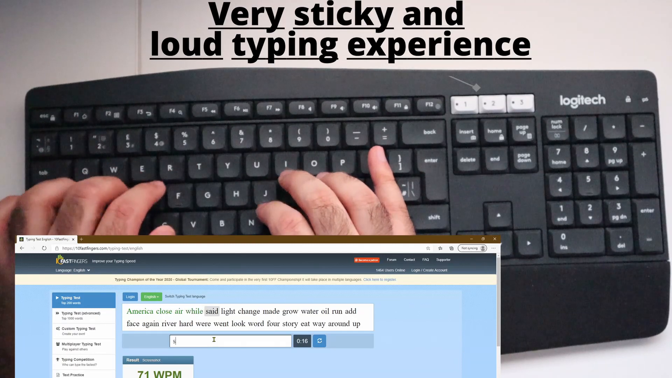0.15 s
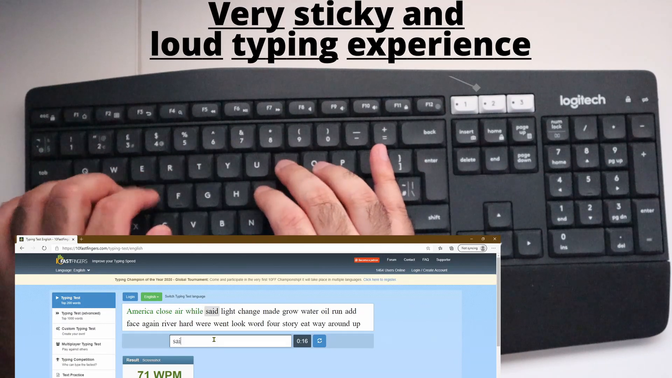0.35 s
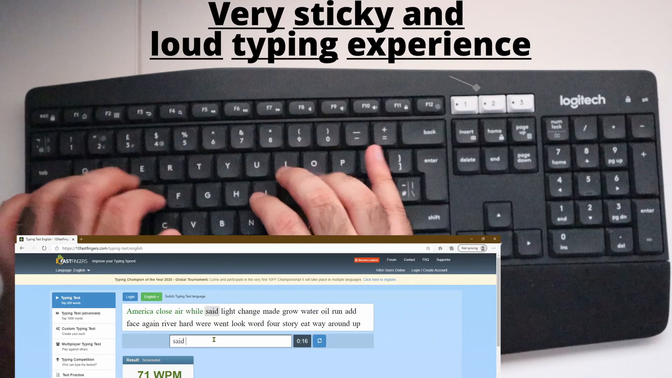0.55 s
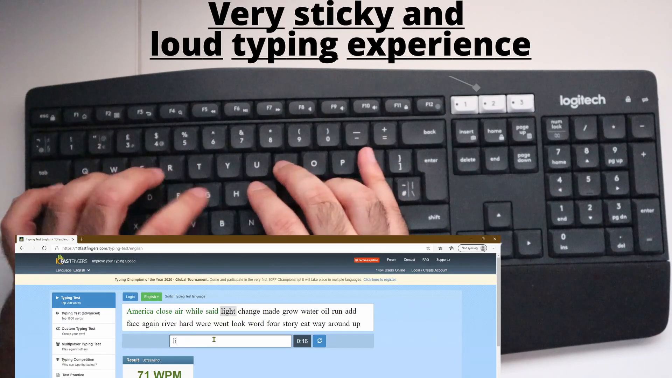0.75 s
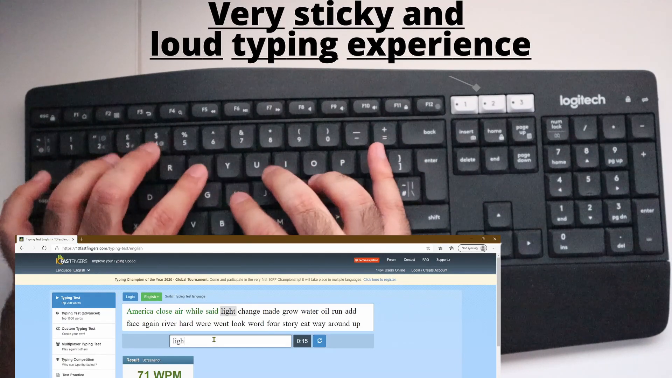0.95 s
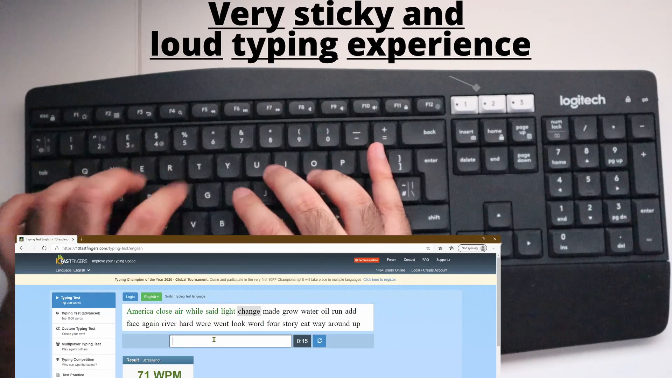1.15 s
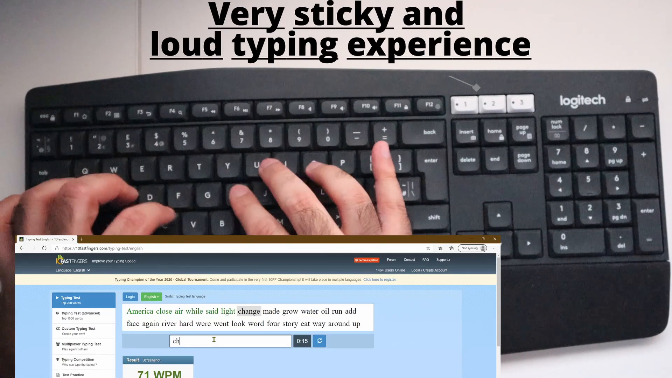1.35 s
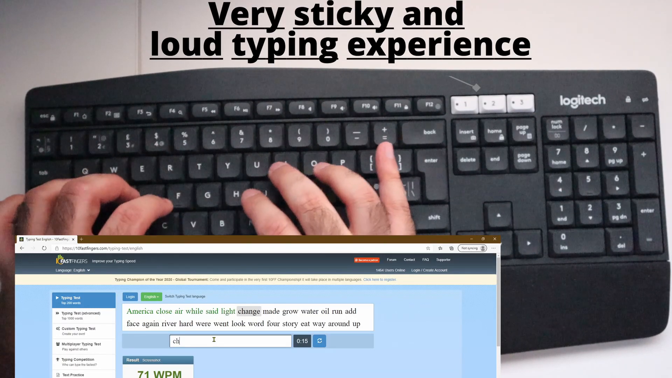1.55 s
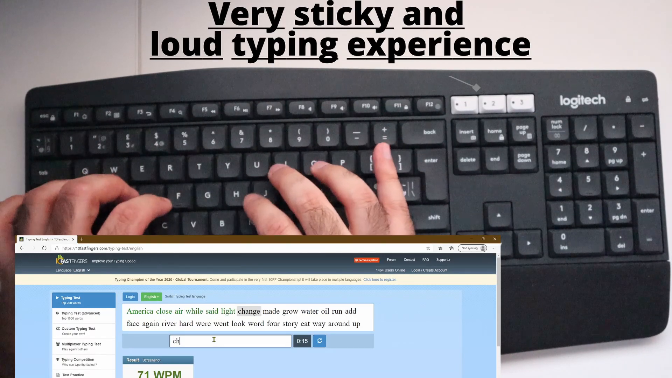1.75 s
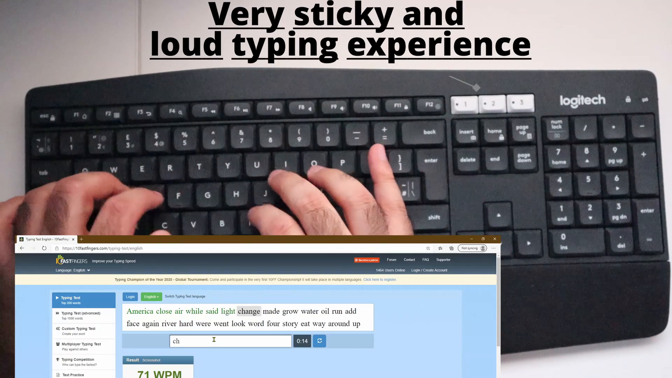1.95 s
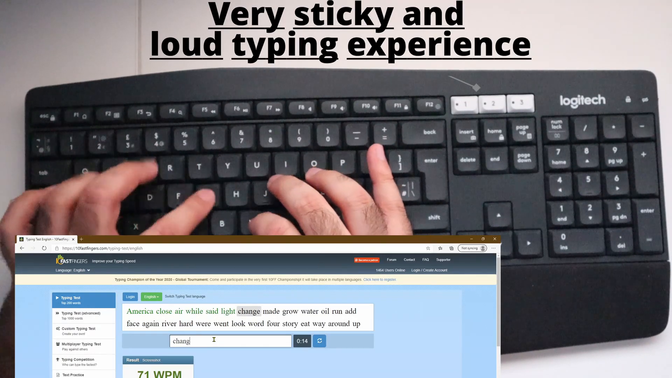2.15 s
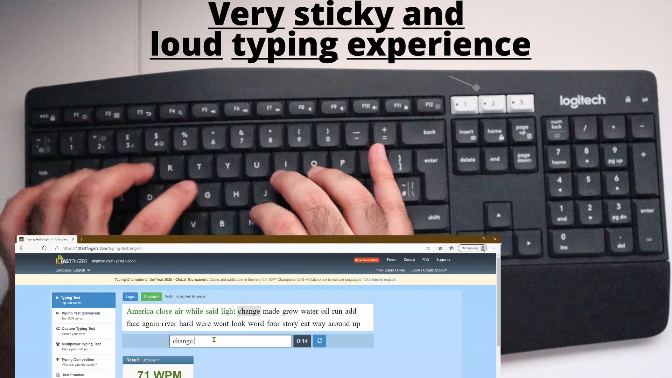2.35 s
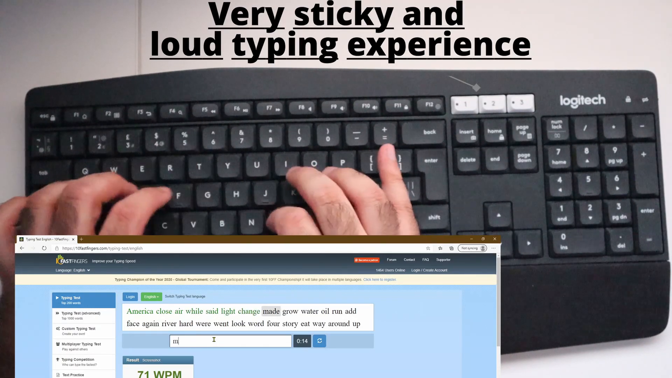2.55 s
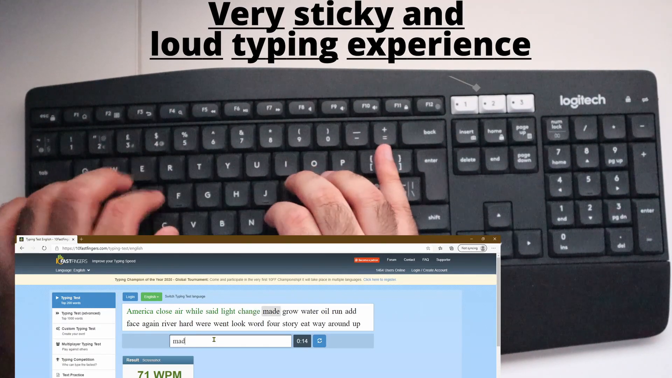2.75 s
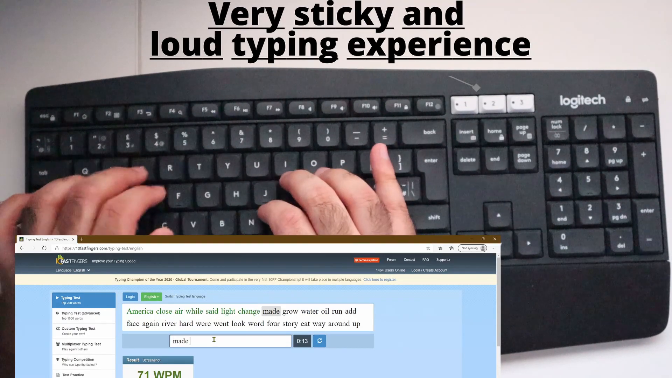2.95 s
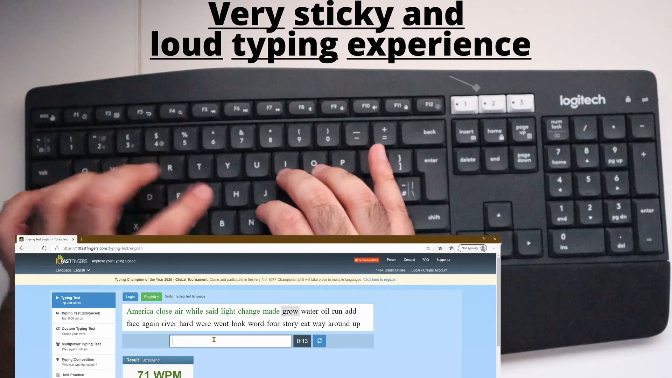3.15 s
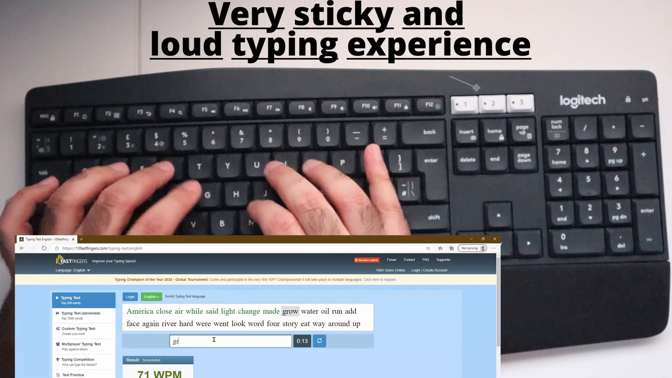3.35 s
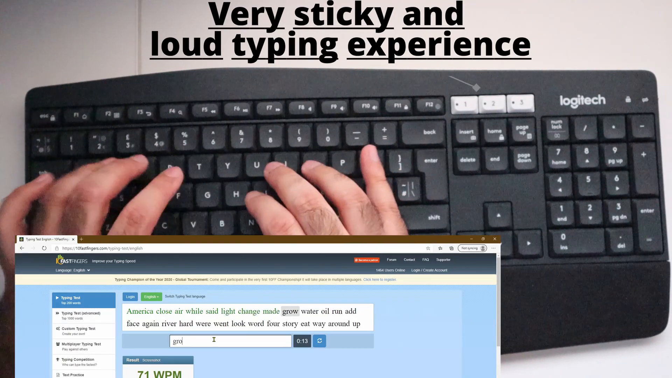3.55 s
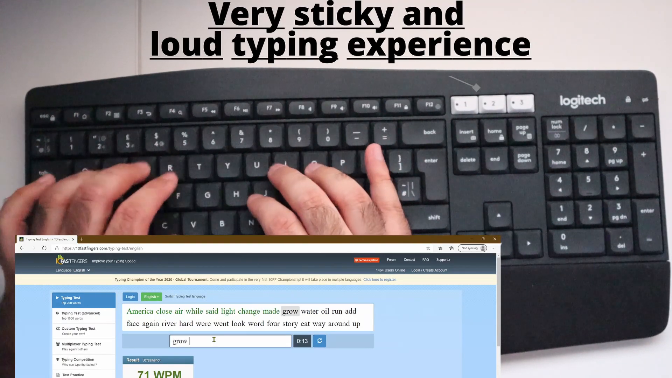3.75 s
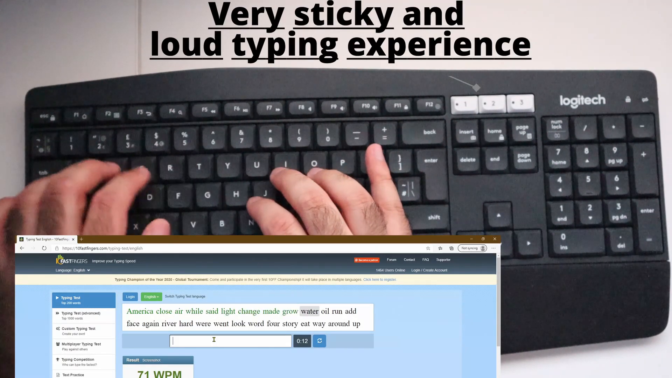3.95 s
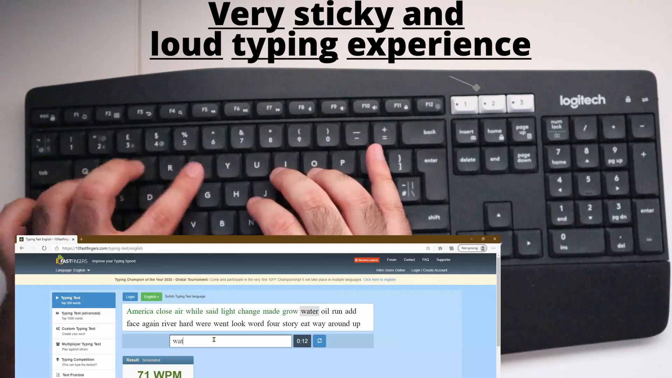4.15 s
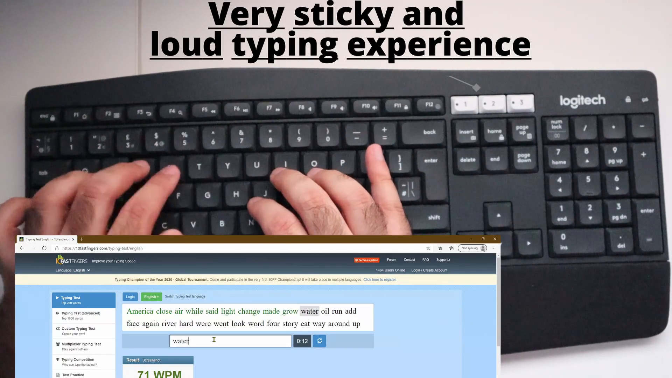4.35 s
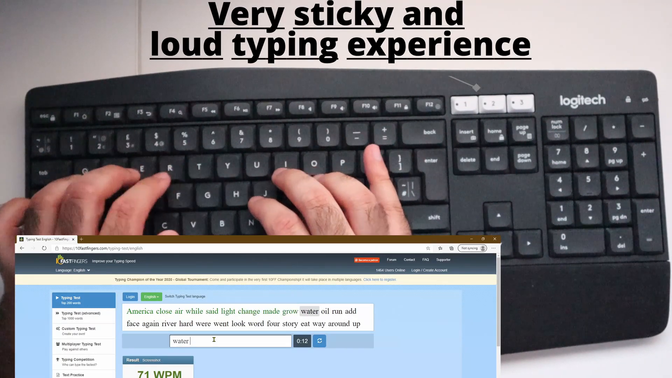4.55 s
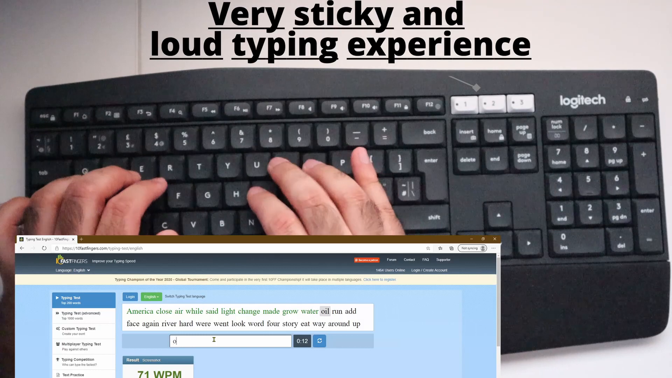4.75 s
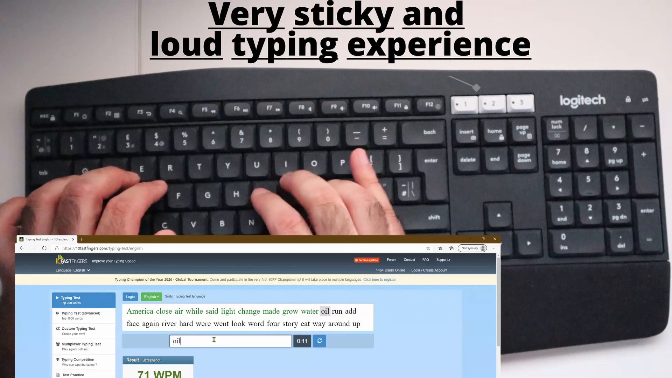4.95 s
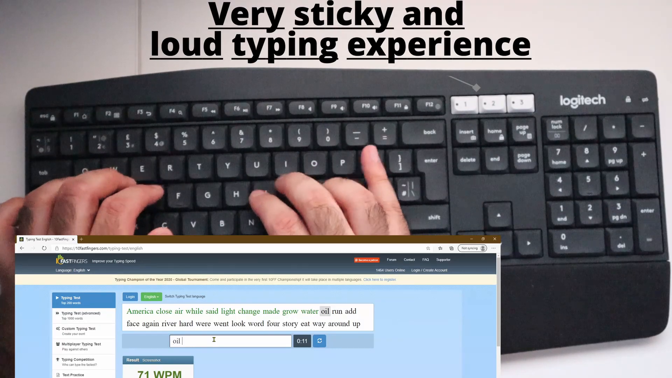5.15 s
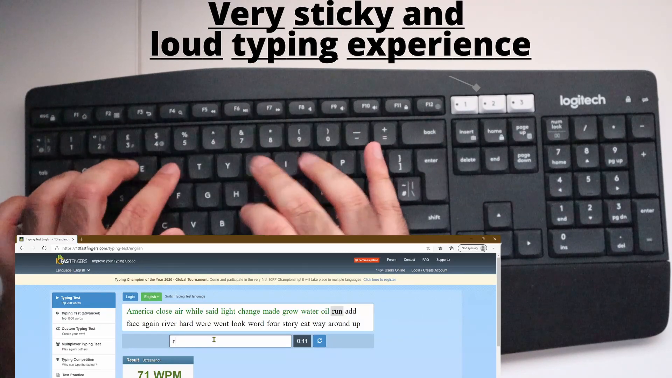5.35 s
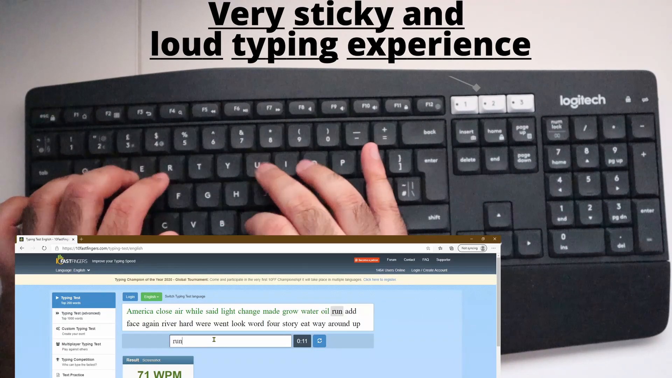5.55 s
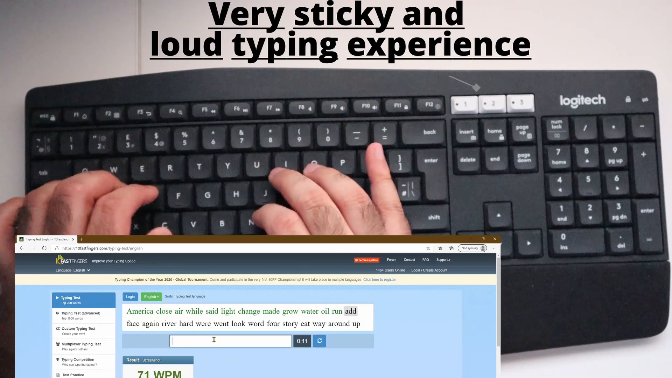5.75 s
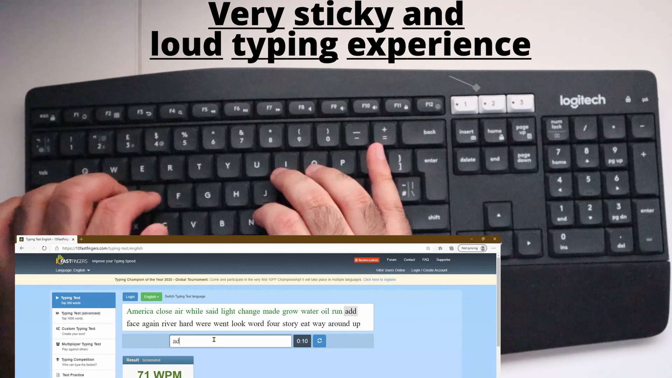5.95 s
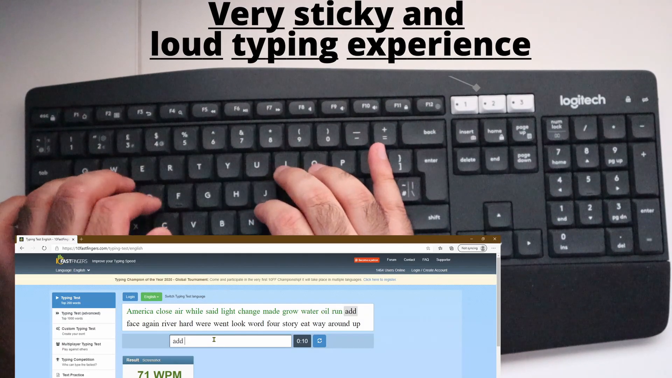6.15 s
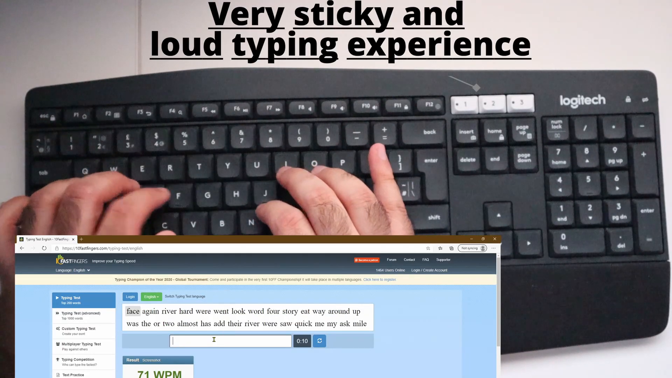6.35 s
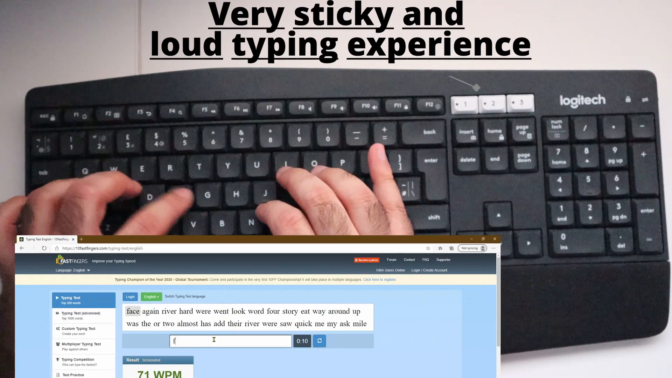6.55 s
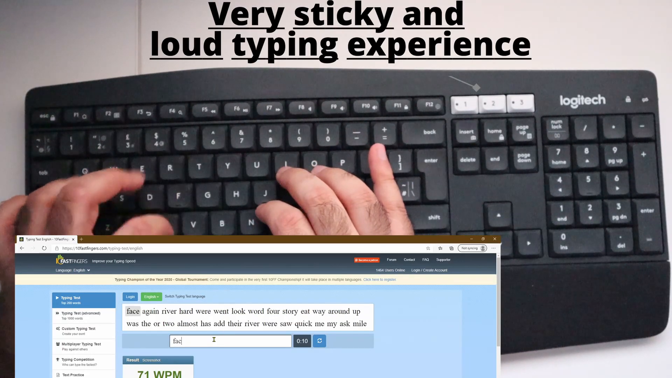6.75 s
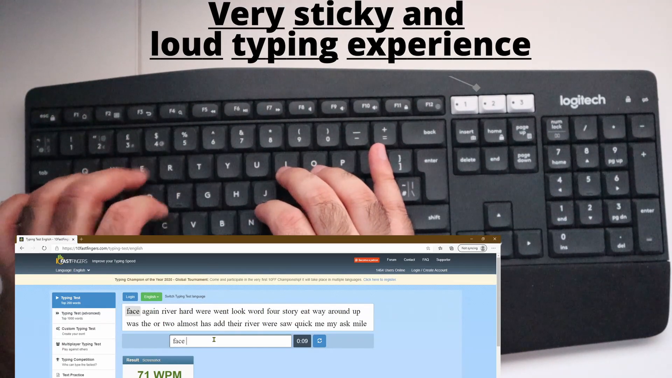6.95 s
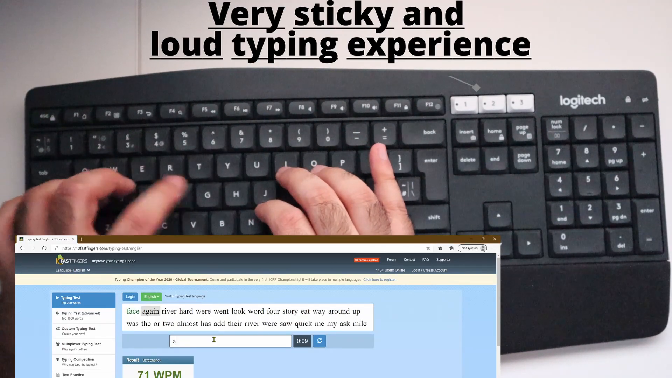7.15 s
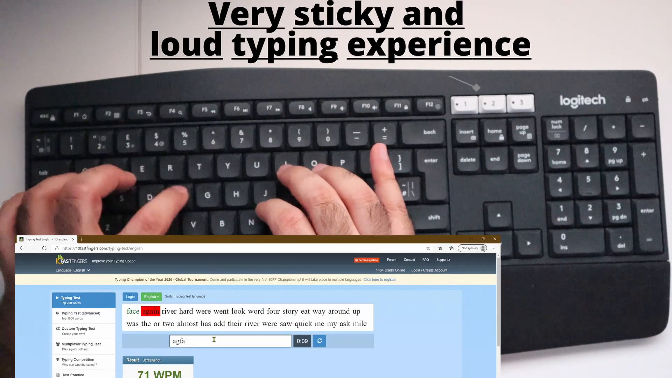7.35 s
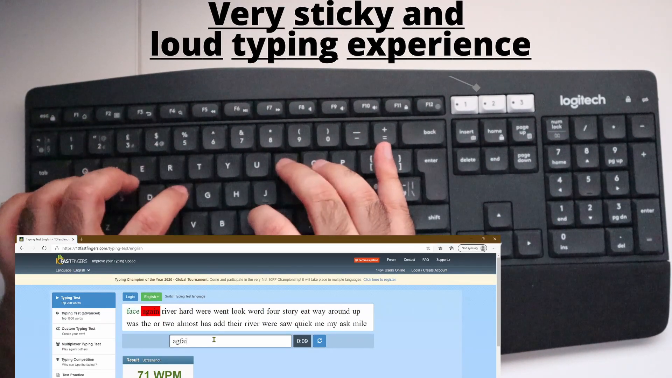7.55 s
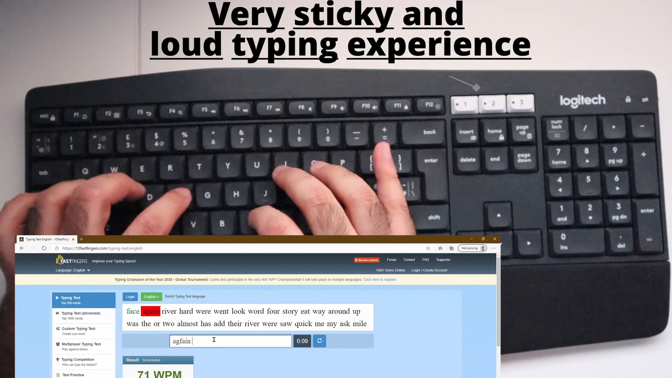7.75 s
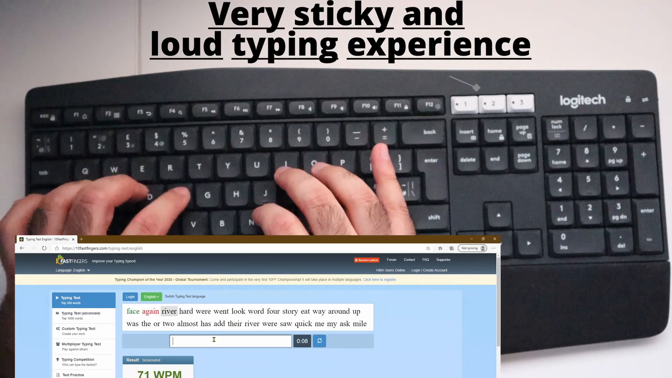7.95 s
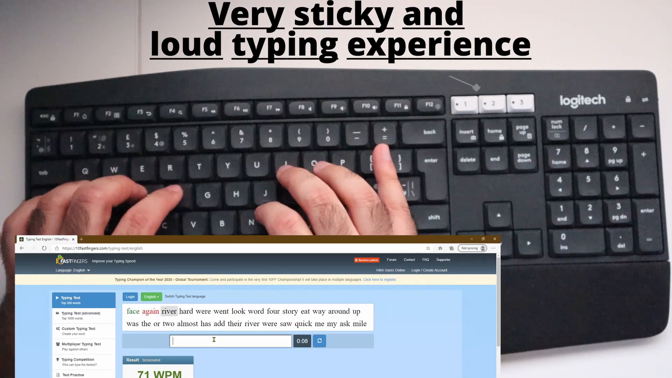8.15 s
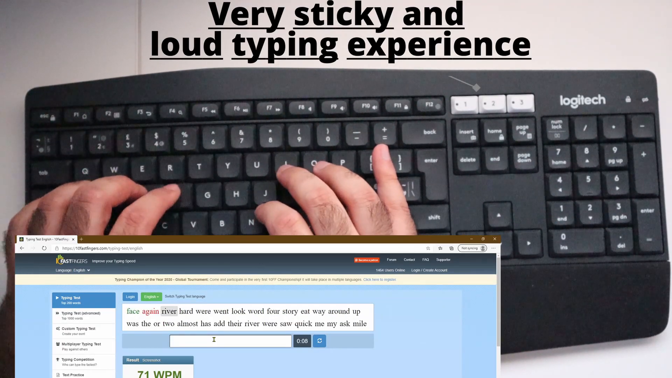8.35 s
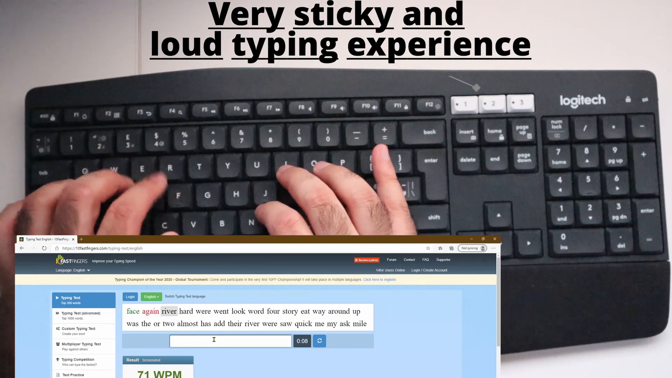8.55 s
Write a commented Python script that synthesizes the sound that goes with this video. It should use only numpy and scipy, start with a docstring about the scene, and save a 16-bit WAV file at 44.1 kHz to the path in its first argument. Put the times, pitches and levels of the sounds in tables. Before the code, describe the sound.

Fast typing on a plastic computer keyboard starts at about 0.2 seconds, heard from close above in wide stereo in a small quiet room. Each key gives a sharp clack with a short loose rattle and a hollow ring from the case, while the fingers send soft, low thuds into the desk. The strokes come in quick, uneven runs, mixing loud hits with light taps. After a short gap from about 1.6 to 2 seconds the typing resumes, with another brief break just before 4 seconds. Fingers scuff faintly across the caps now and then, mostly around 5.5 and 6.8 seconds. The hardest clacks land at about 7.4 and 7.6 seconds. A few light taps follow and the typing ends near 8 seconds, leaving only a faint steady room hush until about 8.7 seconds.

```python
"""Plastic key caps clack and rattle in fast typing on a desk in a small quiet room.
Each cap chatters on its stop and rings the hollow case; each finger blow thuds into the desk
and swings its low boom. Fingers scuff over loose caps, and the room air hushes underneath.
A close microphone pair with a widened stereo image listens from above."""
import sys
import numpy as np
from scipy import signal
from scipy.fft import rfft, irfft, next_fast_len
from scipy.io import wavfile
from scipy.ndimage import uniform_filter1d

SR = 44100
rng = np.random.default_rng(int(sys.argv[2]) if len(sys.argv) > 2 else 0)


def pcm_store(signal):
    """Save signal as 16-bit PCM."""
    levels = np.round(np.clip(np.atleast_2d(signal), -1, 1) * 32767)
    wavfile.write(sys.argv[1], SR, levels.astype(np.int16).T)


N = 378819
LEAD_IN_S = .008  # faint noise swelling just before each clack


def gain_of(db):
    """dB to gain."""
    return 10 ** (np.asarray(db) / 20)

def unit_rms(x):
    """Scales to rms 1."""
    return x / np.sqrt(np.mean(x ** 2) + 1e-20)

def curve(points, hz):
    """Table value at each frequency, on a log axis."""
    f, value = np.transpose(points)
    return np.interp(np.log(hz + 1), np.log(f + 1), value)

def shaped(x, gain):
    """Filters along time; gain is a function of Hz."""
    size = next_fast_len(x.shape[-1], True)
    return irfft(rfft(x, size) * gain(np.fft.rfftfreq(size, 1 / SR)), size)[..., :x.shape[-1]]

def add(mix, start_s, sound):
    """Mixes a sound in at start_s."""
    part = mix[..., round(start_s * SR):][..., :sound.shape[-1]]
    part += sound[..., :part.shape[-1]]

def ring(t, hz, db, t60):
    """One dying mode."""
    return gain_of(db - 60 * t / t60) * np.sin(2 * np.pi * hz * t)

def ripple(size, depth_db, span):
    """A random gain, depth_db rms, smoothed over span points."""
    return gain_of(depth_db * unit_rms(uniform_filter1d(rng.standard_normal(size), span)))


# Key strokes; the last four columns colour the clack:
# start_s, level_db, low_ring_hz, high_ring_hz, case_db, high_ring_db, tick_db, rattle_db
STROKES = [(0.2377, -50.5, 1310, 3650, -11, -8.0, -22, 1),
           (0.3044, -25.5, 1590, 3300, -0.5, -10, -16.5, -11.5),
           (0.32, -29.5, 1670, 3720, 0, -13, -35.0, -12.5),
           (0.3664, -22, 1314, 4060, -17, -5.5, -20.5, -19.5),
           (0.4771, -26, 1910, 2800, -14, -3.5, -13, -7.0), (0.508, -38.5, 2700, 5600, -23, -5, 5, -13),
           (0.621, -39.5, 2480, 2820, -25.0, -2, -13, -10.5), (0.7125, -41.5, 2600, 3200, 0, -5, -19, -12),
           (0.7407, -29, 2030, 4170, -3.5, -12, -19, -6.5),
           (0.7811, -22.5, 2560, 2660, -15, -1, -18.5, -18),
           (0.7938, -25.5, 1080, 3930, -8, -8, -17.5, -13.5),
           (0.8865, -30.5, 1930, 4270, -16, -10, -17, -7.5),
           (0.8916, -31.0, 2500, 2590, -12, -17, -18, -14), (0.9041, -35, 2180, 4000, -11, -11, -21, -12),
           (0.9736, -25, 2350, 3770, -15, -6, -11, -14.0), (0.998, -35, 1470, 2780, -8, -14, -23, -7.5),
           (1.0676, -30, 1810, 4100, -4, -12.5, -19, -13.5), (1.074, -30.5, 2040, 4050, -11, -11, -20, -10),
           (1.116, -28.5, 2280, 4300, -22, 1, 2.5, -15), (1.119, -33.5, 2100, 4100, -5, -1, -11, -20),
           (1.1978, -48, 1740, 2860, 1, -17, -31, -9), (1.213, -54, 2000, 4500, -20, -5, -12, -20),
           (1.2795, -57, 2500, 4500, -20, 2, -14, -14), (1.3296, -27.5, 2270, 2990, -31, -3.5, -15, -9.5),
           (1.4195, -21.5, 2280, 2430, -34, 1.5, -22, -15),
           (1.4265, -27, 2230, 2550, -2.5, 3, -17.5, -13.5),
           (1.449, -25.5, 1430, 4100, 2.5, -21, -20.5, -13.5),
           (1.5457, -40, 1340, 4680, -11, -14, -25, -28), (2.0294, -44, 1070, 3820, -15, -12, -22, -10),
           (2.0464, -43.5, 1040, 3230, -13.0, -16, -38, -9),
           (2.132, -33.5, 1170, 3920, 2.5, -9, -17, -10.5), (2.2481, -43.5, 1850, 2590, 10, -9, -18, -0.5),
           (2.2851, -28.5, 1840, 2380, -20, -13, -23, -11.5), (2.327, -26, 2760, 3340, -4.5, -1, -9.5, -12),
           (2.338, -34, 2900, 6000, -20, -3, 1.5, -12.5), (2.344, -30, 2900, 3500, -11, -2, -14, -14.5),
           (2.384, -39.5, 1510, 4000, -8, -5, -10, -11), (2.456, -48, 2780, 4700, -25, 0, -10, -11),
           (2.556, -53.5, 2980, 5450, -25, -4, -12, -10),
           (2.6275, -28.5, 1440, 3900, -19, -20.5, -35.0, -11.5),
           (2.6646, -32, 1500, 3660, -24, -21, -35.0, -17.5),
           (2.7306, -34.5, 1010, 3880, -2, -10.5, -22, -8),
           (2.7561, -20.5, 2300, 3680, -44.0, -7.5, -20, -15.5),
           (2.8425, -21, 1180, 3840, 0, -4, -14.5, -13.5), (2.9513, -37.5, 2400, 2970, 2, 9.5, -3, -6),
           (2.978, -38, 1030, 4300, 1, -19, -6.5, -10.5), (3.018, -32, 2400, 3330, -29, -8.5, -11, -7.5),
           (3.037, -28.5, 2680, 4500, -7, 15, -36.0, -14), (3.266, -31.5, 2660, 3000, 0.5, -6, -22, -14),
           (3.2799, -33.5, 1760, 2980, -20, -23, -34.0, -10),
           (3.3253, -34, 1800, 2560, -18.0, -23, -39.0, -12.5), (3.365, -49, 3000, 3700, -25, -9, -21, -15),
           (3.3944, -44.5, 2190, 2800, 10, -9.0, -19, -14), (3.411, -43.5, 1020, 4070, -1, 1, -11, -10.5),
           (3.433, -42.5, 2350, 3230, -9, -5, -6, -11.5), (3.5078, -47.5, 2180, 3000, 0, -4, -20, -3),
           (3.5366, -31, 2280, 4100, -5.5, -2.5, -20, -14), (3.5485, -38, 1490, 2900, 0, -21, -18, -19),
           (3.663, -32, 2530, 3650, -9, 1, -12.5, -11.5), (3.687, -38, 1650, 3620, -7, -8, -19, -16),
           (3.7358, -30.5, 2600, 3070, -6.5, 6.5, 6, -13.5),
           (4.0926, -35.5, 2700, 2920, -7, 0.5, -11.5, -10), (4.117, -35, 1690, 2730, -10, -12, -32, -8),
           (4.168, -46, 1050, 2580, -13.0, -19, -29, -3), (4.2221, -41, 1030, 2700, 7, -25, -34, -5.5),
           (4.252, -29.5, 2150, 4050, -5, -9, -24, -11), (4.278, -29.5, 1240, 4240, -14, -14, -25, -14.5),
           (4.369, -44, 1690, 4440, -26.0, -7, -16, -7), (4.397, -20, 2080, 4460, -34.0, 3.5, -15.5, -15.5),
           (4.431, -34, 1920, 4430, -26, 3, -16, -26), (4.4655, -41, 2240, 4400, -57, 2, -3, -15),
           (4.496, -36.5, 2330, 4500, -12, 1.5, 4.5, -15), (4.594, -43.5, 1010, 2870, 3, 0.5, -11.5, -17.5),
           (4.797, -38.5, 1740, 3750, -29.0, 4, -18, -13), (4.8382, -39.5, 1170, 3820, -18.0, -11, -24, -5),
           (4.8616, -28.5, 1164, 2600, -14, -11, -21, -14),
           (4.884, -29.5, 2740, 3980, -34.5, -13, -19.5, -11),
           (4.8886, -25.5, 1350, 3780, -30, -4, -41.0, -17),
           (4.9481, -41, 1300, 3570, -5, -13, -22.5, -10.5), (5.005, -44.5, 990, 3980, 0, -9, -23, -8.5),
           (5.026, -36, 2630, 2610, -1.5, -22, -30, -14.5), (5.055, -52, 2600, 4940, -20, 4, -22, -15),
           (5.197, -35, 2850, 5900, -30, 2, 5.5, -14.5), (5.397, -53, 1100, 3500, -10, -1, -10, -12),
           (5.432, -45.5, 1170, 4040, 1, 9, -22, -11.5), (5.5174, -42.5, 1290, 3830, 4, -22, -33, -11),
           (5.563, -44.5, 1670, 3640, 6, -11, -18, -5.5), (5.604, -39, 1510, 6200, 0, 5, 9, -15.5),
           (5.677, -46, 1010, 3000, -3, -25, -35, -12), (5.7164, -39.5, 1630, 2930, -35, -23, -39, -12.5),
           (5.861, -38, 990, 2440, -1, -16, -28, -11), (5.886, -42.5, 2430, 2550, -27.0, -9, -20, -6),
           (5.9, -47, 2500, 5800, -25, 3, -5, -18), (5.94, -23, 1244, 3420, -8, -5, -16, -14),
           (6.0565, -41.0, 2210, 3560, -22, -10, -22, -6), (6.11, -47, 1190, 4200, -21, -5, -25, -4),
           (6.1681, -30, 3500, 5850, -12.5, -2, 0.5, -10.5), (6.3994, -48.5, 1420, 3050, -3, -20, -29, -6),
           (6.456, -34, 2320, 4240, -33, 2, -11.5, -14.5), (6.573, -29.0, 2500, 3000, -34, -3, -9, -13.5),
           (6.665, -32.0, 1600, 3980, 3, -12.5, -19.5, -10), (6.703, -37, 1150, 3970, 1, -31, -45, -11),
           (6.797, -51.5, 1090, 3300, 4.0, -21, -33, 1), (6.8244, -44.5, 1040, 2960, -8.0, -19, -27, 0),
           (6.8393, -36.5, 2440, 2900, -4, -20, -51, -9.5), (6.8672, -38.5, 960, 2910, 14.5, -37, -41, -11),
           (6.9257, -28, 1276, 3420, 0.5, -3, -18.5, -13.5), (6.9397, -38, 1050, 4550, 6, -44, -25, -4),
           (6.9711, -34, 1010, 3800, 3, 5, 2, -15.5), (7.183, -31.5, 1070, 3900, -1, 18.5, 0.5, -13),
           (7.199, -47.5, 996, 4000, -17, -28, -41, 1.5), (7.2552, -43.5, 1420, 3700, -2.0, -43, -38, -3),
           (7.3197, -37, 2580, 3930, -2, -6, -21, -12), (7.352, -30, 1500, 3900, -17, -15.5, -28, -11),
           (7.417, -17, 2280, 4060, 1.5, -11, -17, -14.5), (7.4556, -23, 1100, 4200, -28, -17, -17, -13.5),
           (7.557, -44, 1140, 3930, -22.0, -17, -24, -2.0), (7.6125, -17, 2340, 2630, -38, 1, -10.5, -15),
           (7.688, -37, 2450, 2770, -32, -6, -3, -13.5), (7.7016, -30, 1670, 3800, -27.0, -16, -28, -12),
           (7.841, -49.0, 1510, 4760, -13, -17.0, -23.0, -15), (7.918, -48, 2210, 2700, 4, 5, -10, -31)]

def keys():
    """The typing: one clack for each cap that hits its stop."""
    out = np.zeros((2, N))
    for start_s, *voicing in STROKES:
        add(out, start_s - LEAD_IN_S, clack(*voicing))
    return out

def clack(level_db, low_hz, high_hz, case_db, high_db, tick_db, rattle_db):
    """The cap chatters on its stop, then rattles as the case rings; from two angles."""
    t = np.arange(8192) / SR - LEAD_IN_S
    after = np.maximum(t, 0)
    tone = [(400, -14), (1000, -5.5), (2500, high_db / 2 - 2.5), (4700, high_db),  # freq_hz, level_db
            (5600, tick_db + 2.5), (9000, tick_db - 4.5), (12000, 1.7 * tick_db - 8.5),
            (14500, 1.6 * tick_db - 32), (16000, 1.6 * tick_db - 40)]

    def hump(hz, centre_hz, width):
        return 1 / (1 + ((hz - centre_hz) / (width * centre_hz)) ** 2)

    def cap_eq(hz):
        rings = hump(hz, low_hz, .052) + gain_of(high_db + 2.5) * hump(hz, high_hz, .052)
        return gain_of(curve(tone, hz) - 6) + rings

    def clatter_eq(hz):
        rings = .53 * hump(hz, low_hz, .21) + gain_of(high_db - 7) * hump(hz, high_hz, .093)
        return gain_of(curve(tone, hz)) + rings

    def contact(peak_s, release):
        contact_s = .0014 * gain_of(-.12 * (level_db + 21.5))  # soft strokes touch longer
        return np.exp(-.5 * ((t - peak_s) / (np.where(t < peak_s, .55, release) * contact_s)) ** 2)

    noise = rng.standard_normal((2, len(t)))
    chatter = shaped(noise, lambda hz: cap_eq(hz) * ripple(len(hz), 4, 18))  # many small modes
    body = uniform_filter1d(chatter, 11)  # the lower rings build up later than the tick
    attack = (chatter - body) * contact(.00078, 1.42) + body * contact(.0019, 1.04)
    attack /= np.sqrt(2 * uniform_filter1d(attack[:, :1024] ** 2, 30).max(1, keepdims=True))

    grit = ripple(len(t), depth_db=1.64, span=120)
    clatter = unit_rms(shaped(chatter[:, ::-1], lambda hz: clatter_eq(hz) / cap_eq(hz)))
    melt = 1 - np.exp(-after / .025)  # the cap rings melt into a broad clatter
    loose = np.sqrt(1 - melt) * unit_rms(chatter) + np.sqrt(melt) * clatter
    decay_s = .33 * (1690 / low_hz) ** .12  # lower caps rattle longer
    fall_db = -60 * after / decay_s - 20 * (after / .84) ** 4
    dull = uniform_filter1d(loose, 5)
    darkening = dull + (loose - dull) * gain_of(.52 * fall_db)
    lead_in = gain_of(-17 + 500 * np.minimum(t, 0)) * (t < .003)
    tail = (1 - np.exp(-after / .0058)) * gain_of(fall_db)
    rattle = gain_of(rattle_db) * darkening * grit * (lead_in + tail)
    return gain_of(level_db) * (attack + rattle + gain_of(case_db) * case_ring(after) * grit)


# Modes of the hollow case: pitch_hz, level_db, t60_s
CASE_MODES = [(680.3, -2.5, 0.074), (843, -7, 0.18), (965.6, 5.5, 0.048), (1170, -3, 0.064)]

def case_ring(t):
    """The case knocks differently each time, as each key sits over another part of it."""
    shape = (2, len(CASE_MODES))
    strikes = rng.choice([-1., 1.], shape) * rng.uniform(.44, .76, shape)
    modes = [ring(t, hz * rng.uniform(.99, 1.015), db, t60) for hz, db, t60 in CASE_MODES]
    return strikes @ modes * (1 - np.exp(-t / .014))


# Finger blows into the desk: start_s, boom_db, box_db, knock_db
FINGER_BLOWS = [(0.25, -52, -55.5, -60), (0.272, -37.5, -56, -37.5), (0.312, -33, -51, -60),
                (0.373, -39, -46, -46), (0.435, -42, -53, -49), (0.498, -44.5, -61, -48.5),
                (0.583, -48, -55, -51), (0.776, -49, -42, -37), (0.906, -58, -50, -34),
                (0.995, -53, -63.5, -35), (1.165, -70, -56.5, -45), (1.359, -54.5, -65, -42),
                (1.519, -57.5, -73, -51.0), (2.051, -35, -50, -45), (2.118, -42.0, -60, -63),
                (2.166, -43.5, -44, -43), (2.251, -51, -49.5, -38), (2.344, -47.5, -51, -35),
                (2.409, -58.5, -52.5, -36.5), (2.569, -55.5, -70, -47), (2.669, -50, -48, -60),
                (2.758, -36.5, -70, -50), (2.871, -41, -59, -43), (2.955, -43.5, -71, -44),
                (3.032, -46.5, -48, -36.5), (3.12, -60, -70, -60), (3.199, -70, -71.0, -45),
                (3.285, -47.5, -54.5, -24.5), (3.396, -75, -72, -36.5), (3.438, -51, -55, -38.5),
                (3.542, -60, -49, -48), (3.688, -45.5, -60, -42), (3.773, -54.5, -47.5, -40),
                (3.955, -74.0, -76, -41.5), (4.115, -48, -80.0, -52), (4.182, -37, -65, -36),
                (4.282, -46, -77, -56), (4.401, -44, -66.5, -41), (4.55, -65, -51, -38),
                (4.718, -83, -68, -39), (4.838, -52.5, -45.5, -49), (5.06, -46, -42.5, -42),
                (5.242, -61, -49, -48), (5.395, -73, -67, -37), (5.449, -49, -59.5, -35),
                (5.589, -44, -48, -37.5), (5.676, -56, -48, -42), (5.849, -69, -81, -36.5),
                (5.894, -37, -59, -52), (5.97, -35.5, -57, -39.5), (6.138, -42.5, -61, -67),
                (6.21, -45.5, -53.5, -42), (6.27, -66, -73, -57), (6.4, -75, -83, -35.5),
                (6.695, -31.5, -55, -36.5), (6.75, -41, -71, -49), (6.815, -48.5, -60, -55),
                (6.879, -41, -49, -44), (6.949, -40, -61, -45), (7.029, -46, -51.5, -31.5),
                (7.045, -64, -68, -60), (7.212, -36, -57.5, -41), (7.354, -43, -53, -37),
                (7.424, -39.0, -40.5, -24.5), (7.519, -58, -59, -47), (7.61, -78, -66.0, -76),
                (7.75, -54, -46, -51), (7.946, -56, -58, -59), (8.039, -60, -59.5, -75)]
# Higher desk modes: pitch_hz, level_db, t60_s, layer (0 box, 1 knock)
DESK_MODES = [(271.3, 9.5, 0.25, 0), (332.8, 2.5, 0.24, 0), (199.2, -3.5, 0.37, 0), (417.8, -6, 0.16, 1),
              (496.4, -13.5, 0.18, 1), (566.5, -16.5, 0.32, 1), (690, 3, 0.05, 0)]

def desk_thuds():
    """Soft fingertip blows ring the desk modes and shove the desk; from two angles."""
    t = np.arange(SR // 4) / SR
    out = np.zeros((2, N))
    count = len(DESK_MODES)
    for start_s, boom_db, box_db, knock_db in FINGER_BLOWS:
        detune = rng.uniform(.96, 1.04, count)  # the hands load the desk differently each time
        modes = [ring(t, hz * detune[k], db + (knock_db if layer else box_db), t60)
                 for k, (hz, db, t60, layer) in enumerate(DESK_MODES)]
        shove_db = .46 * boom_db + .54 * box_db - 5
        shove = shaped(rng.standard_normal((2, len(t))), lambda hz: (hz > 18) / (1 + (hz / 80) ** 4))
        shove = unit_rms(shove) * gain_of(shove_db - 60 * t / .39)
        thump = shaped(rng.standard_normal((2, len(t))),  # flesh on plastic: no pitch
                       lambda hz: 1 / (1 + (170 / (hz + 1)) ** 4) / (1 + (hz / 550) ** 4))
        thump = unit_rms(thump) * gain_of(max(box_db, knock_db - 11.5) - 7.5 - 60 * t / .21)
        strikes = rng.choice([-1., 1.], (2, count)) * rng.uniform(.36, .78, count)
        ringing = strikes @ modes
        rocking = ringing * ripple(len(t), depth_db=2, span=350)  # the case rocks on its feet
        fingertip = rng.standard_normal(1500) * gain_of(-60 * t[:1500] / .088)  # many small contacts
        thud = signal.fftconvolve(rocking, fingertip[None], axes=1)[:, :len(t)]
        thud *= np.linalg.norm(ringing) / np.linalg.norm(thud)
        onset = 1 - np.exp(-t / .0022)
        add(out, start_s - .003, (.34 * rocking + .92 * thud + shove + thump) * onset)
    return out

def desk_boom(pitch_hz=130.8, t60_s=.53):
    """The lowest desk mode, wavering: each blow sets its swing anew, and it dies until the next."""
    t = np.arange(N) / SR
    start_s, boom_db = np.transpose(FINGER_BLOWS)[:2]
    last = np.maximum(np.searchsorted(start_s, t) - 1, 0)
    swing = gain_of(boom_db[last] - 60 * (t - start_s[last]) / t60_s) * (t > start_s[0])
    waver, throb = unit_rms(shaped(rng.standard_normal((2, N)), lambda hz: 1 / (1 + (hz / 20) ** 4)))
    phase = 2 * np.pi * np.cumsum(pitch_hz + 4.5 * waver) / SR
    return uniform_filter1d(swing, 350) * gain_of(2.06 * throb) * np.sin(phase)

def cap_nudges(lead_s=.002):
    """A landing fingertip faintly nudges its cap just before each blow."""
    out = np.zeros((2, N))
    for (start_s, *_), (force, low, high) in zip(FINGER_BLOWS, rng.random((len(FINGER_BLOWS), 3))):
        nudge = clack(-58 + 6 * force, 1000 + 600 * low, 2800 + 700 * high,
                      case_db=6, high_db=-14, tick_db=-21, rattle_db=-9)
        add(out, start_s - lead_s - LEAD_IN_S, nudge)
    return out


# Fingers scuffing over loose caps: start_s, length_s, level_db
FINGER_SCUFFS = [(1.241, 0.1, -64.5), (2.551, 0.089, -61), (3.2, 0.075, -58), (5.4, 0.14, -61),
                 (5.5, .26, -57.5), (5.799, 0.13, -62), (6.682, 0.068, -54), (6.79, .14, -58)]
# Tone of the rub: freq_hz, gain_db
SCUFF_EQ = [(300, -12), (800, 0), (1700, -3.5), (2600, -9.5), (4500, -16.5), (6000, -32), (12000, -39)]

def scuffs():
    """Dense uneven small contacts while fingers slide from key to key."""
    out = np.zeros((2, N))
    for start_s, length_s, level_db in FINGER_SCUFFS:
        size = round(length_s * SR)
        grain = ripple(size, depth_db=3.6, span=150)
        rub = shaped(rng.standard_normal((2, size)) * grain, lambda hz: gain_of(curve(SCUFF_EQ, hz)))
        add(out, start_s, gain_of(level_db) * unit_rms(rub) * np.sqrt(np.hanning(size)))
    return out


# Tone of the room air: freq_hz, gain_db
AIR_EQ = [(12, -56), (20, -12), (138, -10.5), (177, 1), (198, -12.5), (388, -12.5), (558, -17),
          (607, -14.5), (976, -15), (1060, -18.5), (1710, -21.5), (2020, -17.5), (2820, -22.5),
          (11100, -43), (14200, -51), (15600, -80)]
# Width of the room air: freq_hz, side_minus_mid_db
AIR_WIDTH = [(60, -16), (150, -10.5), (380, 1), (950, 2), (2380, 6), (5980, 6), (15000, 6)]

def room_hush(mid_db=-59.5):
    """The steady air of the room, as mid and side."""
    noise = rng.standard_normal((2, N))
    mid = shaped(noise[0], lambda hz: gain_of(curve(AIR_EQ, hz)))
    side = shaped(noise[1], lambda hz: gain_of(curve(AIR_EQ, hz) + curve(AIR_WIDTH, hz)))
    return np.array([mid, side]) / np.std(mid) * gain_of(mid_db)


# Width of the typing: freq_hz, side_gain_db
TYPING_WIDTH = [(60, -15), (130, -25), (290, -9.5), (640, -8), (1410, -2.5), (3100, 1.5), (6820, 5.5),
                (15000, 6)]
# Lean of the image: freq_hz, mid_share (-1 to 1, negative leans right)
TYPING_LEAN = [(100, -0.23), (500, -0.32), (2000, -0.22), (8000, -0.19), (13000, 0)]

def widened(mid, other):
    """One angle is the mid; the side blends it with the other, narrow in the bass and wide on top."""
    lean = lambda hz: curve(TYPING_LEAN, hz)
    side = shaped(mid, lean) + shaped(other, lambda hz: np.sqrt(1 - lean(hz) ** 2))
    return np.array([mid, shaped(side, lambda hz: gain_of(curve(TYPING_WIDTH, hz)))])

def scene():
    """Typing over the room hush, from mid and side to left and right."""
    typing = keys() + cap_nudges() + scuffs() + desk_boom() + desk_thuds()
    mid, side = widened(*typing) + room_hush()
    return np.array([mid + side, mid - side])

def record(dry):
    """A steep high cut at 16.3 kHz."""
    high_cut = signal.firwin(511, 16300, window=("kaiser", 9), fs=SR)
    return signal.oaconvolve(dry, high_cut[None], "same")


dry = scene()
out = record(dry)
pcm_store(out)
```